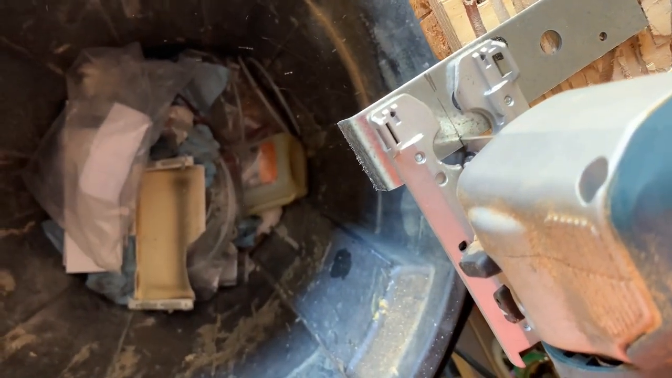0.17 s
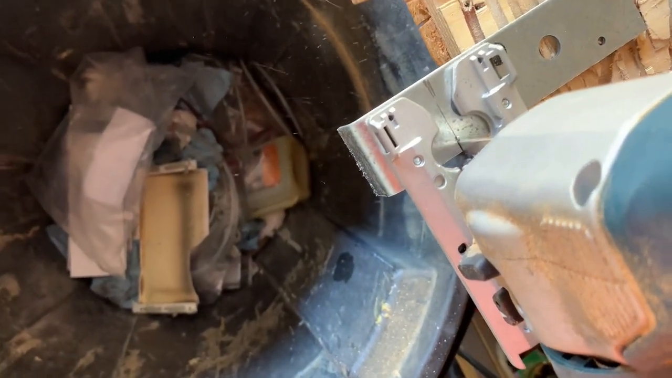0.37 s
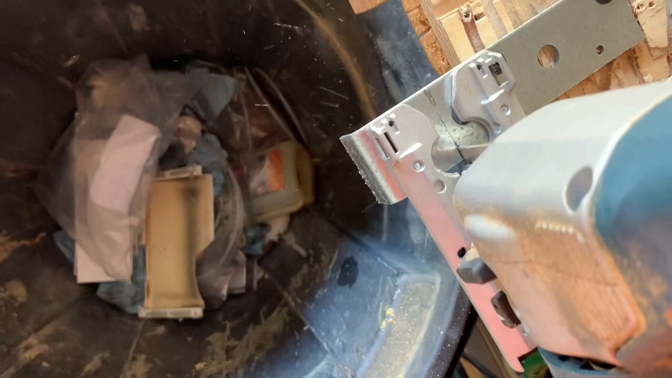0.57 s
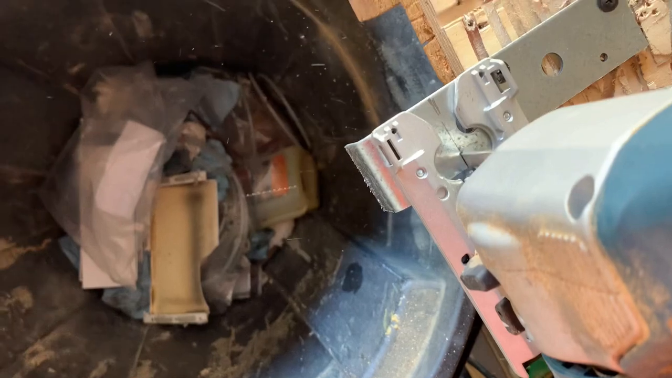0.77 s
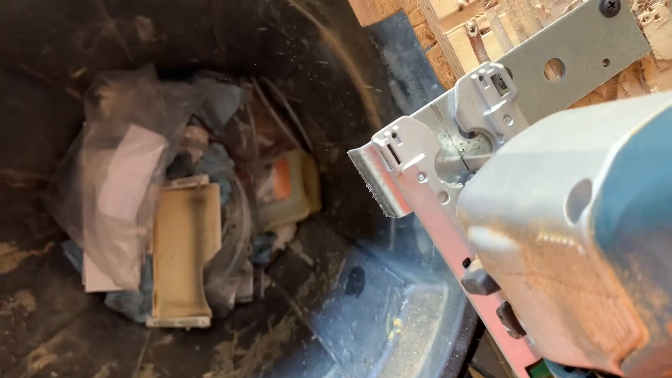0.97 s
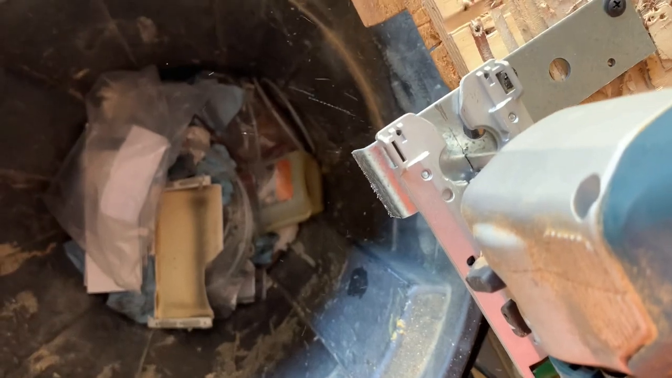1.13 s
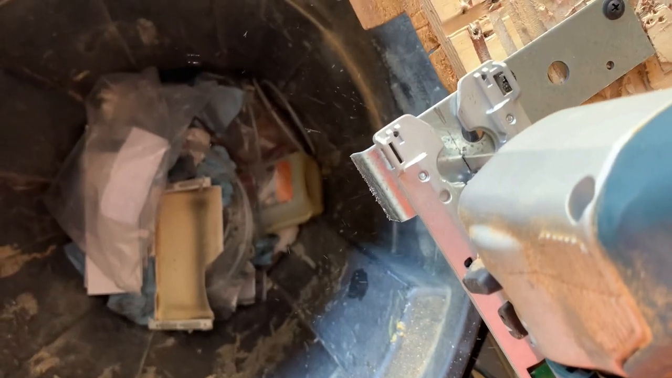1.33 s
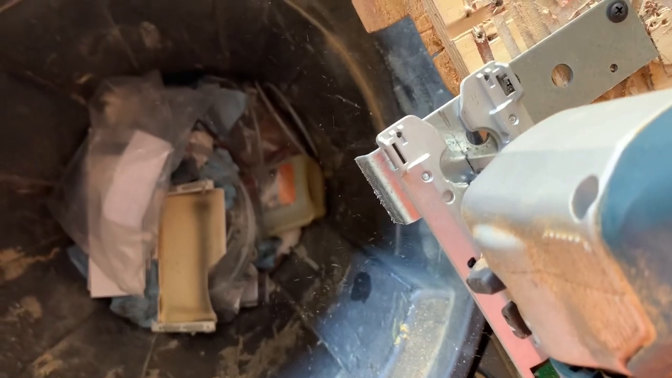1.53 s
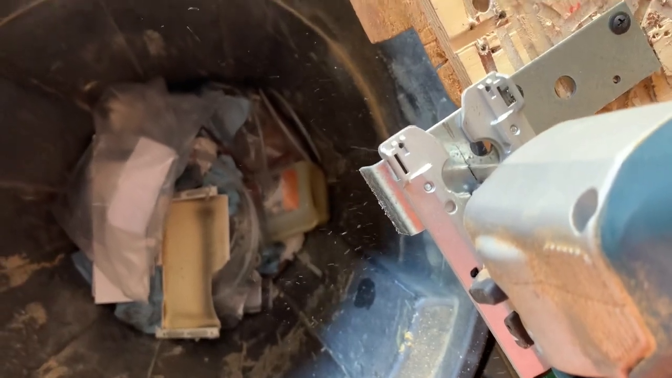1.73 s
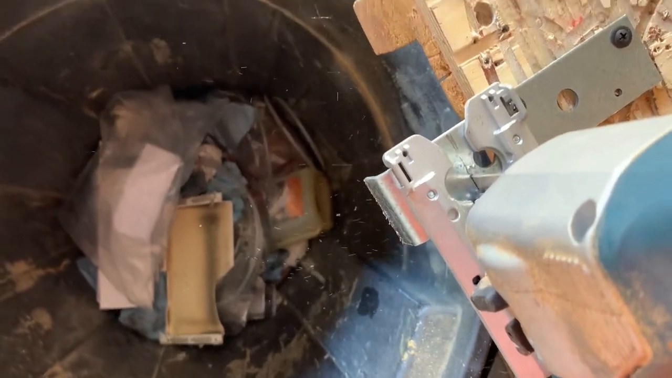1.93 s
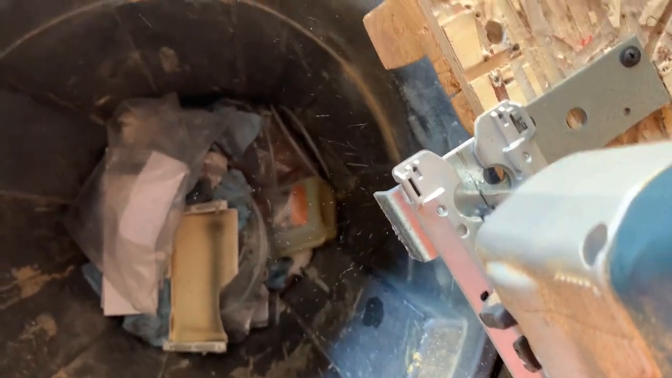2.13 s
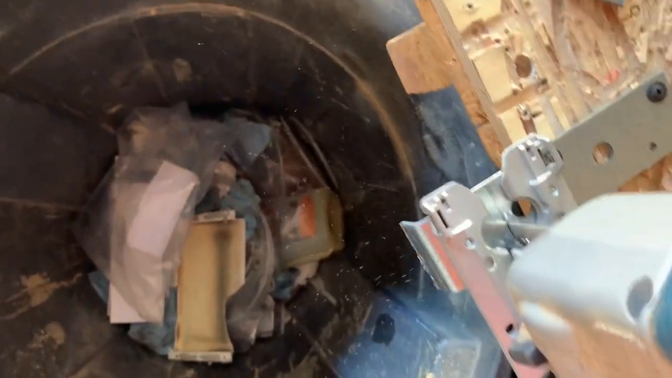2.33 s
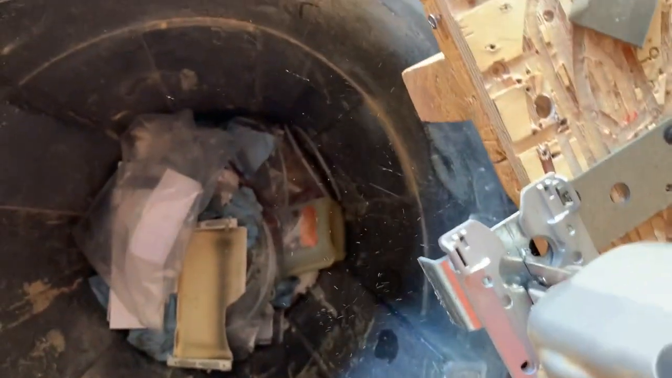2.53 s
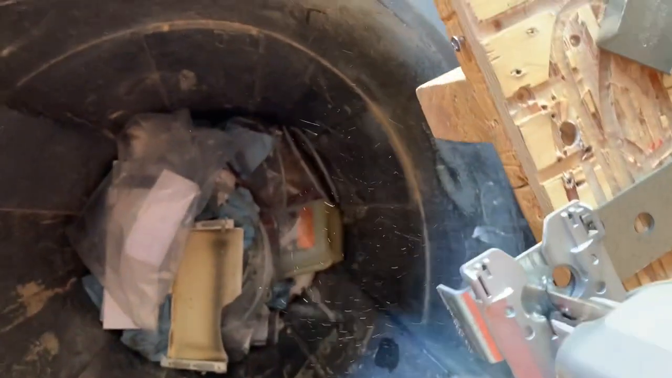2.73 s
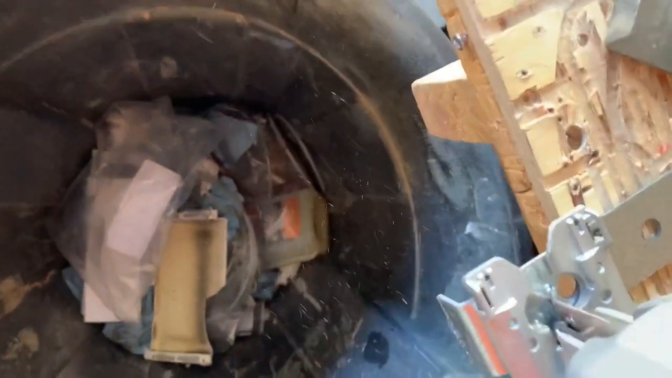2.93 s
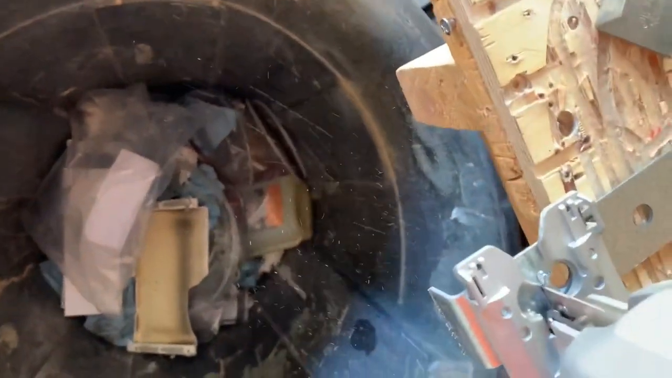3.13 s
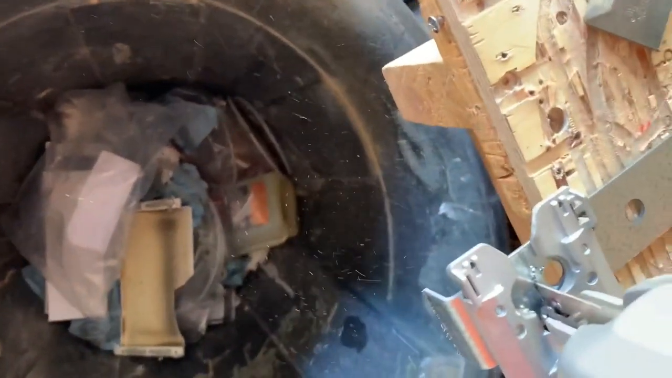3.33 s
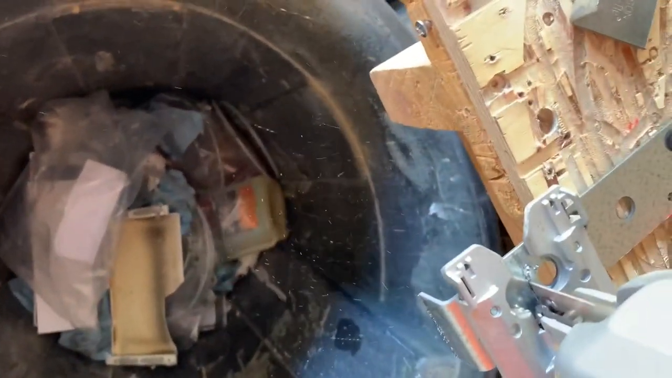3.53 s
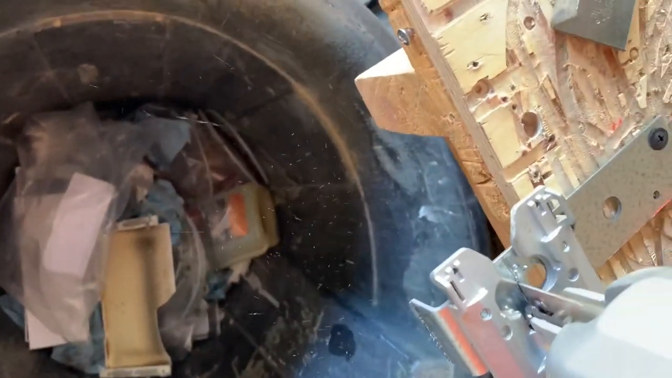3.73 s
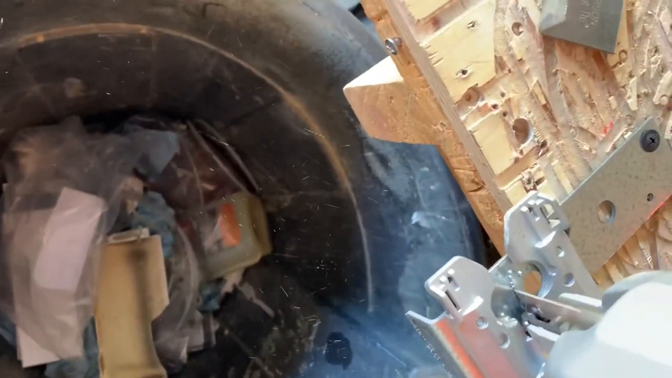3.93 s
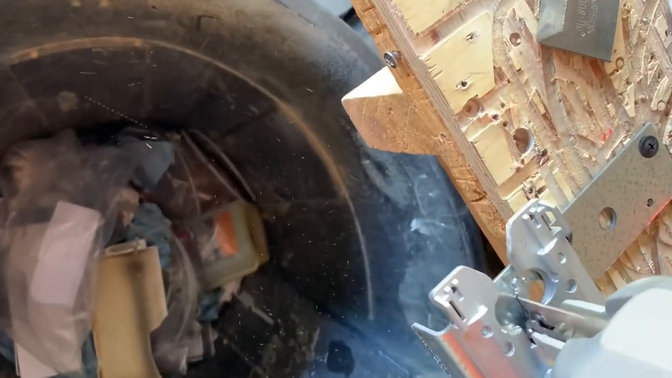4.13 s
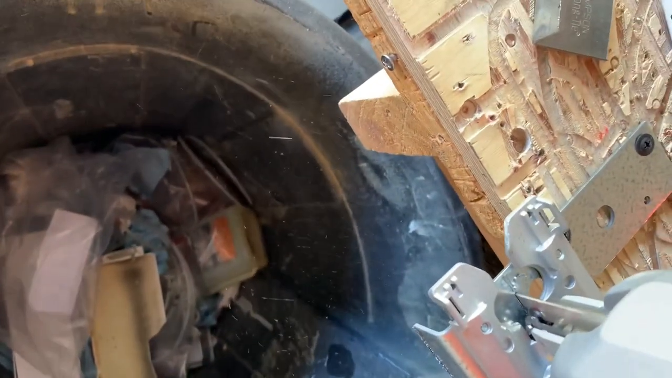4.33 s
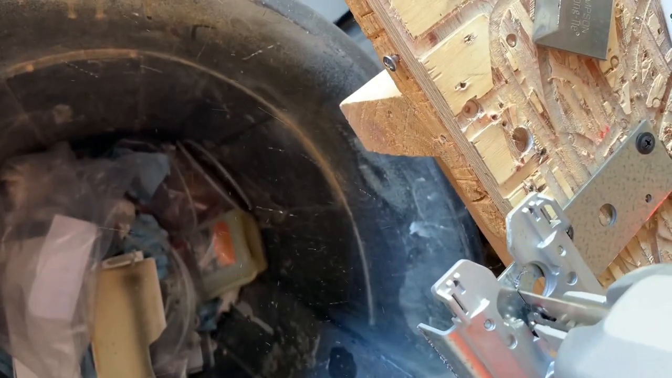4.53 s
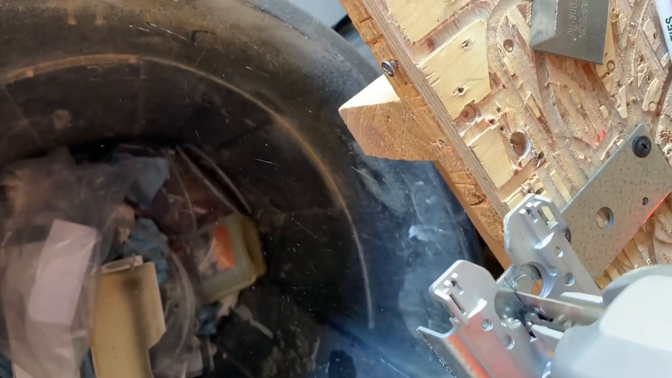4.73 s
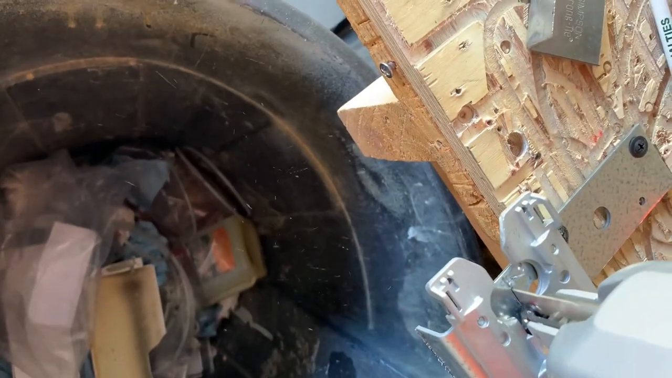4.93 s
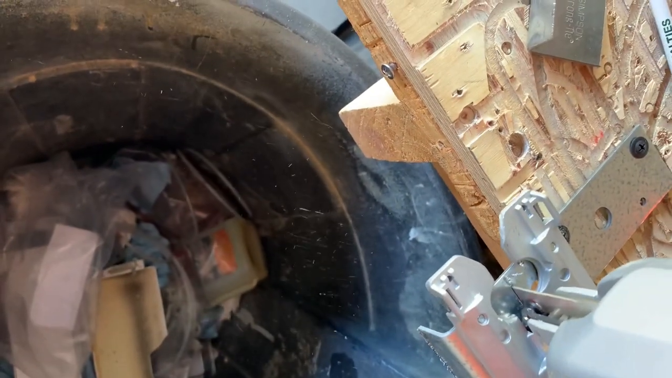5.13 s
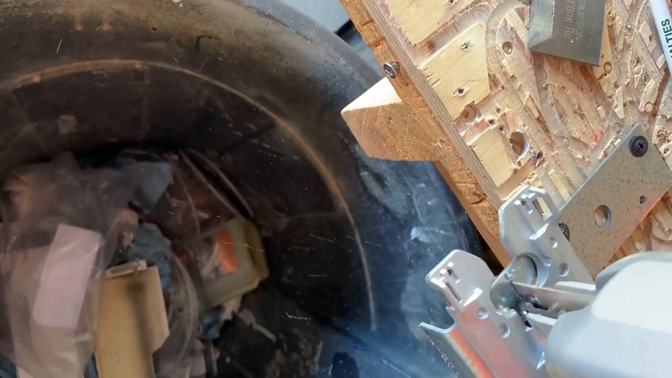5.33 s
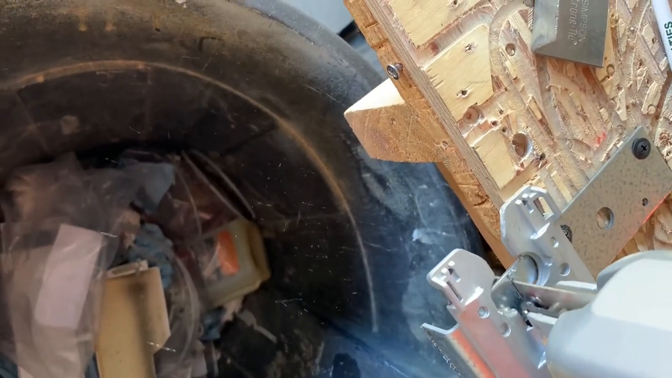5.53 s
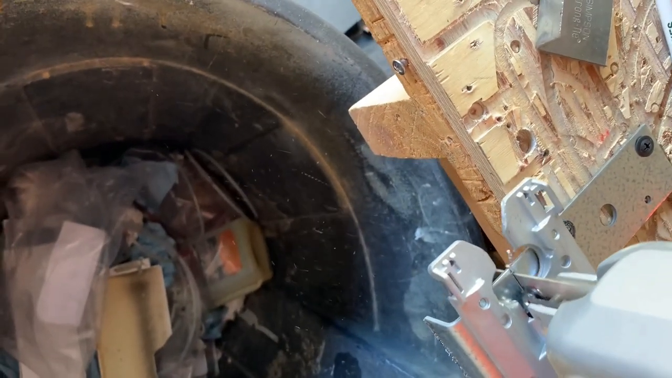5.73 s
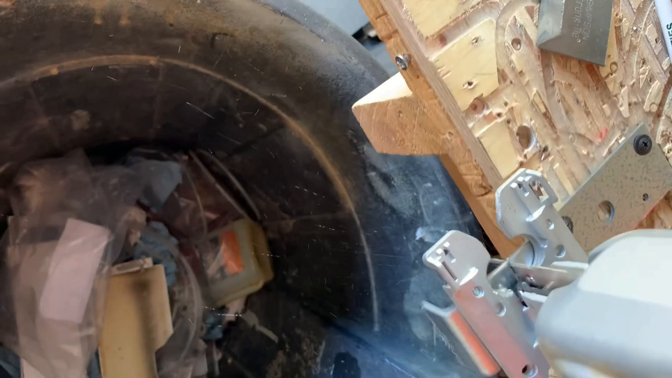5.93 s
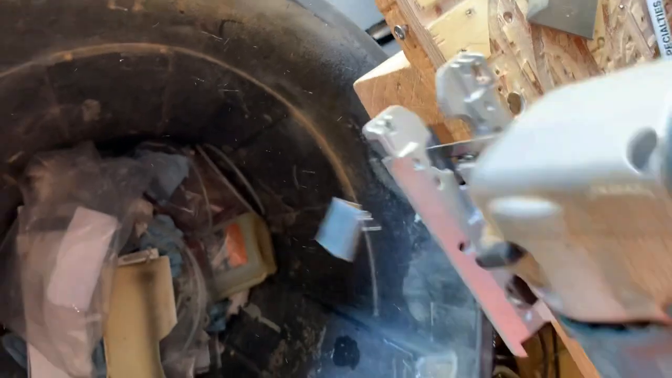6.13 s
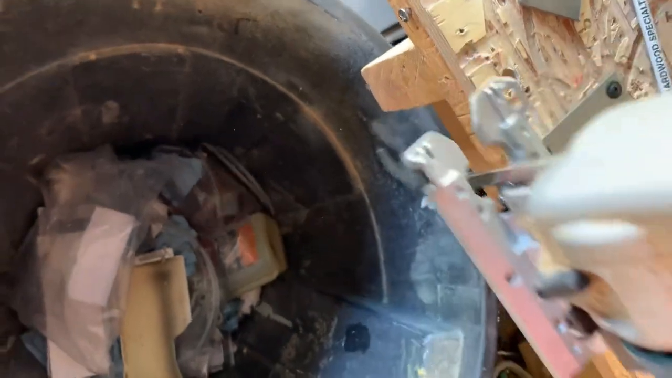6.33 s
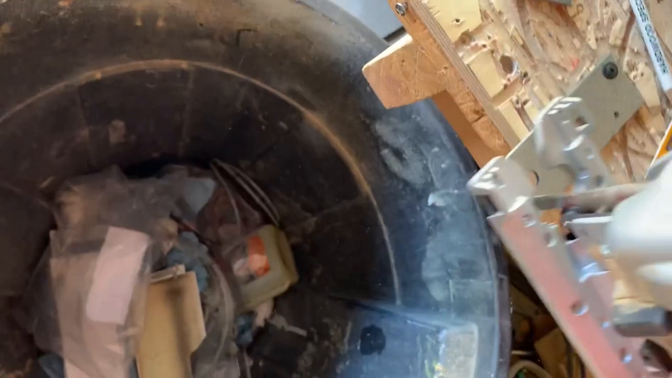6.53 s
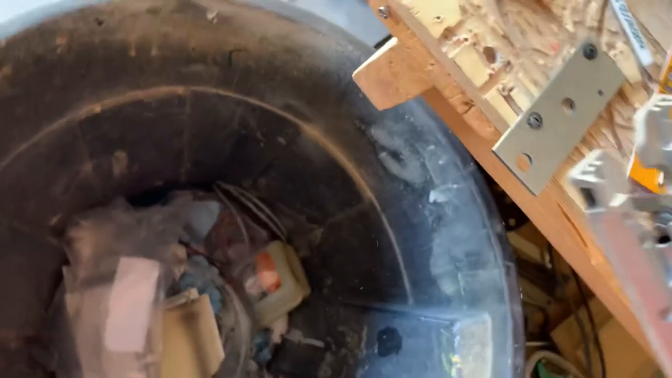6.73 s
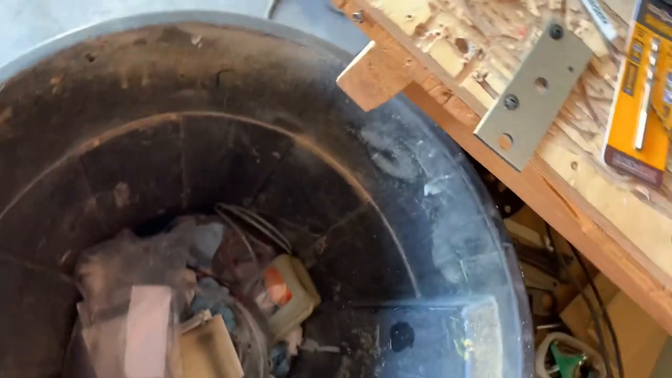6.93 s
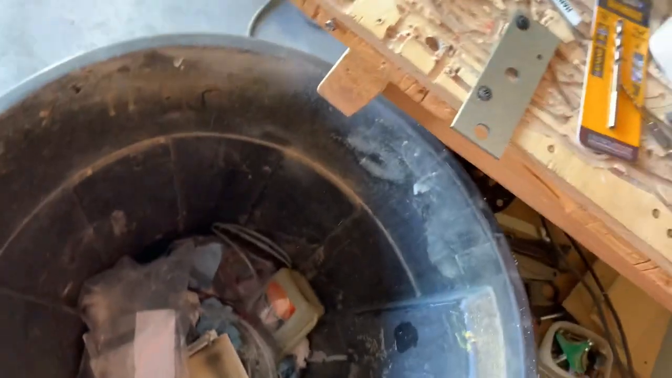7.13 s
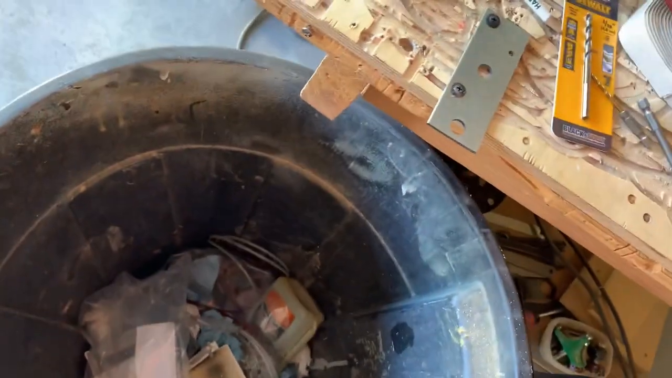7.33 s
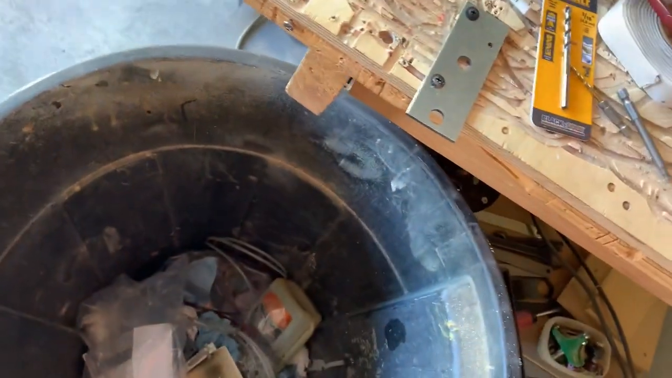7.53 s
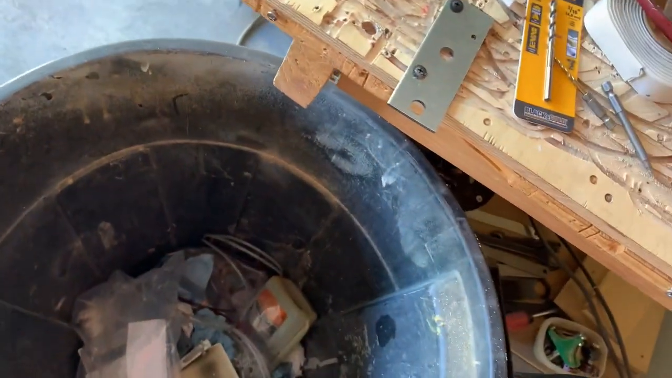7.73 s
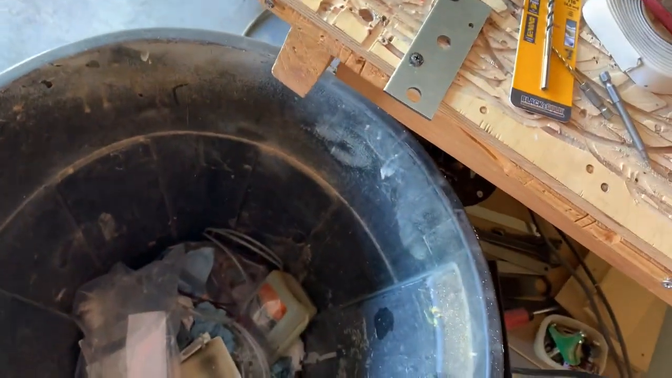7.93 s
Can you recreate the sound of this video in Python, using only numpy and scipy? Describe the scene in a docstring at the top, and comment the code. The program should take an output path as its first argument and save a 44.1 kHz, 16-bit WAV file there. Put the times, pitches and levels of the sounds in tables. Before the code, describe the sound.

Harsh buzzing metal sawing in a small workshop, with shrill squeal and snagging teeth, until the cut frees and the saw's whine winds down.

```python
"""Close to the microphone a jigsaw squeals and rasps through a steel bracket screwed to a bench in a small workshop.
About 47 times a second the blade bites, the drive knocks and the bench hums; now and then a tooth snags.
At six seconds the cut is through: the saw is switched off, bumps as it is lifted and rattles down to single clacks.
Noise through resonances makes steel, housing and bench; sines locked to the stroke make the hum and the buzz."""
import sys
import numpy as np
from scipy import signal
from scipy.fft import rfft, irfft, next_fast_len
from scipy.io import wavfile

SR = 44100
rng = np.random.default_rng(int(sys.argv[2]) if len(sys.argv) > 2 else 0)


def to_wav(sig):
    """Store sig (one row per channel, or 1-D mono) as 16-bit WAV at the path in sys.argv[1].

    Samples outside -1..1 are clipped; the rate is SR.
    """
    pcm = np.clip(np.atleast_2d(sig), -1, 1) * 32767
    pcm = np.round(pcm).astype(np.int16)
    wavfile.write(sys.argv[1], SR, pcm.T)  # frames by channels


N = 352359
TIME = np.arange(N) / SR

# Blade speed under power. Each row: time in seconds, speed in strokes per second.
POWERED_SPEED = [(0.0, 49.75), (0.4, 47.27), (0.9, 47.75), (1.4, 47.37), (2.0, 47.71), (2.3, 49.1),
                 (2.8, 47.57), (3.2, 46.67), (3.55, 47.69), (4.9, 47.2), (5.3, 46.87), (5.75, 47.58),
                 (5.95, 45.66)]
# Once switched off, friction slows the drive evenly.
CUT_ENDS_S, SWITCH_OFF_S, BRAKING_HZ_PER_S = 5.98, 6.1, 19.72

# The hand leans on the saw. Each row: start in seconds, end in seconds, force (about 0-1).
PUSHES = [(0.002, 0.478, 0.78), (1.14, 1.293, 0.59), (5.64, 5.987, 0.57)]
PUSH_EASE_S = 0.15
# Just before the tilt the weight comes off the bench top and it buzzes less.
LIFT_S, LIFT_DB = 2.0, -7
# About then the slot widens, over this time.
SLOT_WIDENS_S = 0.4
# Midway the saw tilts, so that its shoe no longer lies flat; the shoe hops at first, then settles.
TILT_S, TILT_TAKES_S = 2.63, 0.26
HOP_STARTS_S, HOP_RISE_S = 2.64, 0.1
HOP_SETTLES_S, HOP_FADE_S = 3.2, 1
# Deep in the cut the shoe's chatter moves to lower orders and the bracket clangs more.
DEEP_S, DEEP_TAKES_S, DEEP_CLANG_DB = 4.34, 0.51, 5
# Towards the end the thinning bracket works loose.
LOOSE_S, LOOSENING_TAKES_S = 5.3, 0.53
FEED_WANDER_DB = .6  # the hand feeds the saw unevenly

# Loudness of each part in the cut. Each one: plain level in dB, then the dB added by a full push,
# by the tilt and by the loose bracket.
RASP_LEVEL = (-32, 8, 1, 4)
RING_LEVEL = (-33, 5.5, -3, -1.5)
CLANG_LEVEL = (-51, 12, 6.5, 0)
KNOCK_LEVEL = (-35.5, 3, -0.2, -0.5)
SHOE_LEVEL = (-46, 7.5, 5.5, -0.5)
BENCH_LEVEL = (-45.5, 8, -1, 0)
# The same four columns for the bench's upper orders, against the low ones.
UPPER_LEVEL = (-4.5, -2.5, -1.5, -2)

# Squeal of the blade, strongest while it runs tight in the fresh slot. Each row: time in seconds, level in dB.
SQUEAL_LEVEL = [(0, -26.5), (.25, -23.5), (.55, -27.5), (1.05, -26.5), (1.9, -31), (2.25, -37.5),
                (3.4, -40.5), (4.3, -38), (4.65, -36.5), (5.55, -35.5), (5.9, -34.5)]
# Rough screech and clean chirp against the squeal. Each one: dB in the tight slot, dB added once it has widened.
SCREECH_LEVEL = (-2, 4.5)
CHIRP_LEVEL = (-4.5, 0.5)
# Pitch of the chirp, its scatter from bite to bite and its wobble within one.
CHIRP_HZ, CHIRP_SCATTER_HZ, CHIRP_WOBBLE_HZ = 6400, 70, 130
CHIRP_PLACE, CHIRP_WIDTH = .155, .047  # shares of a stroke
TOOTH_SLIP_SAMPLES = 7  # play of the blade from stroke to stroke
# Hiss of the teeth dragging back through the slot. Each row: time in seconds, level in dB.
DRAG_LEVEL = [(0, -32), (1.0, -35), (2.2, -35), (3.2, -34), (4.0, -37), (5.9, -37)]
# Contacts within one stroke. Each row: place in the stroke (0-1), relative level in dB.
KNOCKS = [(0.172, -3.5), (0.314, -5), (0.387, -2.5), (0.463, -1.5), (0.772, -1.5)]
# Teeth that snag. Each row: start in seconds, relative level in dB.
SNAGS = [(0.0956, -14), (0.177, -9), (0.9562, -13), (0.998, -5), (1.3563, -16), (3.0035, -8), (3.6815, -10),
         (4.1649, -19), (4.8213, -10), (4.9057, -14), (5.1597, -15), (5.3078, -12), (5.5625, -7),
         (5.7334, -4.5), (5.8591, -16), (5.9249, -10)]
# The nearly severed piece sings, lower as its last bridge of steel thins.
# Each row: time in seconds, pitch in Hz, level in dB.
OFFCUT = [(3.8, 10880, -39.5), (5.5, 10080, -27), (5.97, 9500, -34), (6.04, 8900, -25), (6.45, 9000, -100)]

# Resonances of blade, bracket, drive housing, shoe, bench, the bracket's clang and the bench thud.
# Each row: frequency in Hz, width in Hz, relative level in dB.
BLADE_MODES = [(5730, 560, -7.5), (6420, 110, -0.5), (6880, 300, -10.5), (7460, 170, -6.5)]
BRACKET_MODES = [(2400, 2100, -3.5), (3039, 130, 10), (3087, 380, 5.5), (3930, 420, 6.5)]
HOUSING_MODES = [(1195, 355, 3), (1352, 205, 9.5), (1374, 154, 5), (1578, 160, 1), (1800, 88, -1),
                 (2096, 210, -9)]
SHOE_MODES = [(689, 61, -1.5), (787, 24, 6), (922, 45, 5), (1002, 80, -0.5), (1102, 63, 2.5)]
BENCH_MODES = [(163, 92, -0.5), (336, 114, -3), (445, 103, 0.5), (632, 145, -4)]
CLANG_MODES = [(2960, 84, 0)]
THUD_MODES = [(50.6, 17, -3), (127, 40, -3), (200, 90, -7), (305, 49, 0)]

# Spectra of the cutting rasp, the dragging teeth, the gears at full and at low speed, the fan's air and the clacks.
# Each row: frequency in Hz, relative density in dB per Hz.
RASP_SPECTRUM = [(1200, -22), (2400, -7), (4000, -2), (5600, -1.5), (8000, -.5), (9000, 0), (10000, 1.5),
                 (11000, 1.5), (12200, -1.5), (14000, -2.5), (15800, -6)]
DRAG_SPECTRUM = [(3000, -20), (6500, -4), (10500, 0), (12500, -4), (15800, -10)]
FAST_GEAR_SPECTRUM = [(60, -27), (200, -25.5), (400, -9.5), (750, -4.5), (1300, 0.5), (1500, 1.5),
                      (1720, -8.5), (2000, -8), (2400, -6), (3000, -7), (3500, 2.5), (4200, -3.5),
                      (6000, -86), (14000, -45)]
SLOW_GEAR_SPECTRUM = [(100, -26), (300, -13.5), (550, -2.5), (1200, -1), (1700, 1), (2130, 3), (2450, -6),
                      (2950, 5), (3500, 6), (4100, -49), (6000, -1), (14000, -30)]
AIR_SPECTRUM = [(1500, -20), (4000, -3), (5000, -.5), (6200, 0), (7000, 2.5), (7700, -3), (9000, -2),
                (11000, -.5), (12300, -5), (15800, -10)]
CLACK_SPECTRUM = [(150, -30), (500, -9), (1700, 1), (3200, 1), (4500, -5), (7000, -4), (11000, -8),
                  (15800, -22)]

# The bench top buzzes as the saw is pressed on it. Each row: multiple of the stroke rate, plain level in dB,
# dB added by a full push, dB added by the tilt.
BUZZ_ORDERS = [(6, -61, 16, -7), (7, -56, 14, -4), (8, -55, 17, -14), (9, -57, -3, -2), (10, -52, 11, -8),
               (11, -52, 9, -4), (12, -46.5, 4, -6), (13, -49.5, 2, -6)]
# The shoe chatters on the bracket in step with the stroke. Each row: multiple of the stroke rate,
# level in dB lying flat, in dB tilted, in dB deep in the cut, dB added by a full push.
SHOE_ORDERS = [(14, -53, -54.5, -50, 3), (15, -54, -58, -48.5, 3), (16, -58, -49, -50, -2),
               (18, -53, -57, -55, -5), (19, -59, -66, -51, 13), (20, -61, -66, -61, 14),
               (21, -55, -44.5, -47.5, -10), (22, -52, -44.5, -46, -8), (23, -49, -48.5, -48, 0),
               (24, -46.5, -44.5, -51, -10), (25, -48.5, -53, -60, -8), (27, -48, -48.5, -49, 1),
               (28, -58, -52, -47, 5), (30, -52, -52, -56, 7), (31, -52, -57, -58, 0),
               (32, -53, -66, -66, -5), (34, -47.5, -63, -63, 0), (35, -48, -58, -64, -10),
               (36, -58, -52, -52, -5), (37, -53, -49, -56, 0), (38, -54, -66, -52, -5),
               (39, -54, -52, -53, 0), (46, -53, -66, -64, -8)]
BUZZ_PLACE, CHATTER_PLACE = .14, .41  # where in the stroke (0-1) bench top and shoe are struck
# The motor's strongest tone under load, at this multiple of the stroke rate.
MOTOR_ORDER = 26
# Its level. Each row: time in seconds, level in dB.
MOTOR_LEVEL = [(0, -36), (.14, -40), (.4, -58), (1.0, -51), (2.1, -44), (2.35, -39.5), (3.15, -35.5),
               (3.4, -41), (3.85, -38), (4.35, -40), (4.7, -47.5), (5.15, -39.5), (5.9, -49)]
# Side tones around it while the saw is rocked over. Each row: multiple of the stroke rate, level in dB.
ROCKING_ORDERS = [(24, -43), (27, -38)]
ROCKING_S, ROCKING_SPREAD_S = 2.64, 0.13
# Side tones while the shoe hops. Each row: multiple of the stroke rate, level in dB.
HOP_SIDE_ORDERS = [(25.5, -43), (26.5, -51)]
TONE_WANDER_DB, TONE_ROUGH_RAD = 2.0, .24
TONE_SCATTER = .72  # range of the orders' random phases, in turns

# Shaking of the bench. Each row: time in seconds, level in dB.
HUM_LEVEL = [(0.0, -45.5), (0.42, -38.5), (0.68, -44), (2.02, -43.5), (2.35, -49), (2.61, -41.5),
             (2.98, -48), (5.46, -53), (5.99, -51), (6.02, -48), (6.25, -68)]
# The bench's low orders, against its shaking. Each row: multiple of the stroke rate, relative level in dB.
HUM_ORDERS = [(2, -12), (3, 0)]
# Its upper orders. Each row: multiple of the stroke rate, relative level in dB.
UPPER_ORDERS = [(4, -9.5), (5, 2.5)]
# The saw's own sway, even all through the cut. Each row: multiple of the stroke rate, level in dB.
SWAY_ORDERS = [(1, -63), (2, -58.5)]
SWAY_FADE_S = 6.1  # the saw leaves the bench and the hum fades
# The shoe hops on every second stroke. Each row: multiple of the stroke rate, relative level in dB.
HOP_ORDERS = [(1.5, -10), (2.5, -2), (3.5, -5), (4.5, -6)]
HOP_DB, HOP_KNOCK_DB = -46.5, 4  # gain of its half orders; extra knocking while it hops
HOP_LIMP = 0.19  # share by which every second stroke is harder while it hops

# The free-running gears and fan. Each one: level in dB at full speed, power of the speed that the amplitude follows.
GEAR_LAW = (-33.5, 1.68)
AIR_LAW = (-32.5, 2.1)
# The slack of the drive closes four times a stroke. Each row: place in the stroke (0-1), strength.
SLACK = [(.17, .6), (.42, 1.0), (.67, .6), (.92, 1.0)]
# The rattle changes colour between these speeds, in strokes per second.
SLOW_RATTLE_HZ, FAST_RATTLE_HZ = 22.6, 33.24
# Whine of the meshing gears as they run down, swelling where it meets a resonance of the case.
# Each row: time in seconds, pitch in Hz, relative level in dB.
WHINE = [(6.12, 1860, -60), (6.22, 1780, -41), (6.35, 1660, -45), (6.48, 1530, -49), (6.6, 1410, -46),
         (6.75, 1270, -42), (6.85, 1160, -59), (7.0, 1020, -60), (7.38, 730, -74), (7.46, 670, -62),
         (7.55, 635, -51), (7.64, 575, -69), (7.75, 480, -63), (7.82, 440, -81)]
# Resonances of the case, each rattled hardest around one speed. Each row: frequency in Hz, width in Hz,
# level in dB at its best speed, that speed in strokes per second, spread in strokes per second.
CASE_MODES = [(1700, 83, -40, 41, 4.4), (1760, 62, -42, 32.4, 5.1), (3530, 60, -46, 43, 2.7),
              (3760, 77, -41.5, 31.3, 5.6), (3410, 44, -51, 28, 4.8), (2080, 65, -54, 27, 11.4),
              (2880, 130, -53, 16.2, 3.2), (2680, 100, -55, 12.5, 2.3), (805, 35, -62, 11.7, 1)]
# At low speed the slack closes with single clacks. Each row: start in seconds, relative level in dB.
CLACKS = [(7.1612, -27), (7.243, -28), (7.3333, -31), (7.3822, -28), (7.4316, -31), (7.4865, -30),
          (7.5408, -41), (7.6017, -38), (7.6655, -43), (7.7369, -39), (7.7957, -34), (7.904, -36)]
# The shoe bumps the bench. Each row: start in seconds, relative level in dB.
BUMPS = [(6.313, -34.5), (6.36, -43)]

# Colour of the workshop's reflections. Each row: frequency in Hz, relative level in dB.
ROOM_COLOUR = [(100, -8), (300, 1), (600, 3), (1100, -2), (1600, -2), (2800, 0), (4300, -12), (9000, -13),
               (15800, -12)]
# Spectrum of the quiet room. Each row: frequency in Hz, relative density in dB per Hz.
QUIET_SPECTRUM = [(30, -2), (100, 11), (200, -3), (1000, -12), (8000, -28)]
QUIET_DB = -84
# Phase by which the left microphone port leads the right. Each row: frequency in Hz, lead in half turns.
PORT_LEAD = [(0, 0), (2100, 0), (4700, 1), (6850, 2), (8950, 3), (11100, 4), (13100, 5), (15300, 6),
             (22050, 9)]
CUTOFF_HZ = 15800


def cutting(turns):
    """Teeth bite on the pull and drag on the return; the knocks shake housing, shoe and bench."""
    blows = knocks(turns, jitter_s=.0006, uneven_db=1.6)
    limp = 1 + HOP_LIMP * hopping() * np.cos(np.pi * turns)
    feed = from_db(FEED_WANDER_DB * drift(11))
    sound = limp * cut_steel(turns) + struck_body(turns, blows)
    return feed * sound * (1 - ease(CUT_ENDS_S, takes_s=0.0043))


def cut_steel(turns):
    """Blade and bracket: grit of the teeth heard as rasp, drag hiss, squeal, ring and clang."""
    # near the end the loose bracket gives way on the return, so the pulls stand out
    grip = np.interp(TIME, [5.4, 5.7], [1, .6])
    pull = window(turns, place=0.13, width=0.1, uneven_db=1.3, lean=.45)
    back = window(turns, place=0.88, width=0.33, uneven_db=3.5) * grip
    rasp = rms_one(colour(grit(grain_db=2.1) * (.7 * grip + pull + .25 * back), RASP_SPECTRUM))
    dragging = window(turns, place=.66, width=.13, uneven_db=2, lean=.35)
    drag = rms_one(colour(grit(grain_db=2) * dragging, DRAG_SPECTRUM))
    # the bracket flexes just after the bite
    flex = window(turns, place=.17, width=.14, uneven_db=1.3, lean=.5)
    scrape = tooth_grit(turns, grain_db=2, alike=.42) * (.85 * grip + .7 * flex + .1 * back)
    ring = rms_one(resonate(scrape, BRACKET_MODES))
    clang = rms_one(resonate(grit(grain_db=2) * (.5 + pull + back), CLANG_MODES))
    clang_db = part_level(CLANG_LEVEL) + DEEP_CLANG_DB * ease(DEEP_S, DEEP_TAKES_S)
    steel = from_db(part_level(RASP_LEVEL)) * rasp + from_db(in_time(DRAG_LEVEL)[0]) * drag
    steel = steel + from_db(part_level(RING_LEVEL)) * ring + from_db(clang_db) * clang
    return steel + from_db(in_time(SQUEAL_LEVEL)[0]) * squealing(turns, back)


def squealing(turns, back):
    """Each bite rings the blade's resonances as a rough screech, with a clean chirp on top."""
    bite = window(turns, place=.125, width=.047, uneven_db=.9, lean=.5)
    screech = rms_one(resonate(grit(grain_db=1.0) * (0.62 + bite + 0.24 * back), BLADE_MODES))
    # the blade's free length changes, so its pitch shifts from bite to bite
    screech = np.interp(TIME + .00016 * drift(45), TIME, screech)
    wide = ease(LIFT_S, SLOT_WIDENS_S)
    screech_db = SCREECH_LEVEL[0] + SCREECH_LEVEL[1] * wide
    chirp_db = CHIRP_LEVEL[0] + CHIRP_LEVEL[1] * wide
    return from_db(screech_db) * screech + from_db(chirp_db) * chirps(turns)


def chirps(turns):
    """On each bite the blade sticks and slips: a clean chirp of a few milliseconds, at a slightly new pitch."""
    stroke = turns.astype(int)
    sharp, late = rng.standard_normal((2, 1024))[:, stroke]
    hz = CHIRP_HZ + CHIRP_SCATTER_HZ * sharp + CHIRP_WOBBLE_HZ * drift(1100)
    swell = window(turns + .008 * late, place=CHIRP_PLACE, width=CHIRP_WIDTH, uneven_db=1.2, lean=.2)
    return rms_one(swell * from_db(2 * drift(900)) * np.sin(2 * np.pi * np.cumsum(hz) / SR))


def struck_body(turns, blows):
    """The knocks and a floor of grit ring the resonances of housing, shoe and bench."""
    # the housing rattles hardest mid-stroke
    chatter = .3 + window(turns, place=.35, width=.08, uneven_db=2, lean=.3)
    shaken = blows + chatter * tooth_grit(turns, grain_db=1.5, alike=.5)
    housing = rms_one(band(resonate(shaken, HOUSING_MODES), 1050, 3200))
    shoe = rms_one(band(resonate(blows + .55 * grit(grain_db=1.5), SHOE_MODES), 640, 1350))
    bench_drive = band(blows, 320, 3000) + 1.1 * grit(grain_db=1.5)
    bench = rms_one(band(resonate(bench_drive, BENCH_MODES), 110, 720))
    housing_db = part_level(KNOCK_LEVEL) + HOP_KNOCK_DB * hopping()
    body = from_db(housing_db) * housing + from_db(part_level(SHOE_LEVEL)) * shoe
    return body + from_db(part_level(BENCH_LEVEL)) * bench


def knocks(turns, jitter_s, uneven_db):
    """Clicks where the slack in drive and shoe is taken up, at the same places in every stroke."""
    out = np.zeros(N)
    strokes = np.arange(1, int(turns[-1]))
    for place, db in KNOCKS:
        late, loud = rng.standard_normal((2, 1024))[:, strokes]
        at = (np.interp(strokes + place, turns, TIME) + jitter_s * late) * SR
        out[np.clip(at.astype(int), 0, N - 1)] += from_db(db + uneven_db * loud)
    return rms_one(out)


def tooth_grit(turns, grain_db, alike):
    """The same teeth pass the edge in the same order on every stroke, so a share of their grit repeats."""
    starts = np.searchsorted(turns, np.arange(int(turns[-1]) + 1))
    slip = rng.integers(0, TOOTH_SLIP_SAMPLES, 1024)[:len(starts)]
    since_start = np.arange(N) - (starts - slip)[turns.astype(int)]
    repeated = grit(grain_db)[since_start]
    share = np.clip(alike, 0, 1)
    return np.sqrt(share) * rms_one(repeated) + np.sqrt(1 - share) * grit(grain_db)


def snags():
    """A caught tooth tears free: a short screech of the blade with a bright crack."""
    screech = rms_one(resonate(grit(grain_db=2), BLADE_MODES))
    crack = rms_one(colour(grit(grain_db=2), RASP_SPECTRUM))
    return from_db(-6) * (screech + crack) * bursts(SNAGS, rise_s=.001, decay_s=.0024)


def offcut(turns):
    """Each pull of the blade feeds a thin ring that lingers just after the cut is through."""
    hz, db = in_time(OFFCUT)
    rubbed = np.interp(TIME, [CUT_ENDS_S - .03, CUT_ENDS_S], [1, .1])
    pulls = 1 + rubbed * (window(turns, place=.16, width=.12, uneven_db=2, lean=.4) * 1.3 - .6)
    wobble_hz = 380 * rubbed * drift(900)
    tone = np.sin(2 * np.pi * np.cumsum(hz + wobble_hz) / SR)
    return from_db(db + 0.96 * rubbed * drift(90)) * pulls * tone


def buzz(turns):
    """Higher orders in bench top, shoe and motor, for as long as the blade is in the steel."""
    push, tilt, deep = pushing(), ease(TILT_S, TILT_TAKES_S), ease(DEEP_S, DEEP_TAKES_S)
    lifted_db = LIFT_DB * ease(LIFT_S, PUSH_EASE_S) * (1 - tilt)
    sound = rough_tone(turns, MOTOR_ORDER, in_time(MOTOR_LEVEL)[0], CHATTER_PLACE)
    for multiple, plain_db, push_db, tilt_db in BUZZ_ORDERS:
        db = plain_db + push_db * push + tilt_db * tilt + lifted_db
        sound = sound + rough_tone(turns, multiple, db, BUZZ_PLACE)
    for multiple, flat_db, tilted_db, deep_db, push_db in SHOE_ORDERS:
        db = flat_db + (tilted_db - flat_db) * tilt + (deep_db - tilted_db) * deep + push_db * push
        sound = sound + rough_tone(turns, multiple, db, CHATTER_PLACE)
    rocking = np.exp(-.5 * ((TIME - ROCKING_S) / ROCKING_SPREAD_S) ** 2)
    sound = sound + rocking * orders(turns, ROCKING_ORDERS, waver_db=1.0)
    sound = sound + hopping() * orders(turns, HOP_SIDE_ORDERS, waver_db=1.0)
    return sound * (1 - ease(CUT_ENDS_S, takes_s=0.022))


def bench_hum(turns):
    """The reciprocating mass sways the saw and shakes the bench; a hopping shoe adds half orders."""
    low = orders(turns, HUM_ORDERS, waver_db=1.0)
    upper = from_db(part_level(UPPER_LEVEL)) * orders(turns, UPPER_ORDERS, waver_db=1.0)
    shaking = from_db(in_time(HUM_LEVEL)[0]) * (low + upper)
    sway = orders(turns, SWAY_ORDERS, waver_db=1.0)
    hop = from_db(HOP_DB) * hopping() * orders(turns, HOP_ORDERS, waver_db=1.0)
    return (shaking + sway) * (1 - ease(SWAY_FADE_S, takes_s=0.34)) + hop


def running_out(turns, speed):
    """Unloaded gears rattle as their slack closes, the fan hisses and the whines of gear and motor sink."""
    slack = sum(strength * window(turns, place, width=.055, uneven_db=2.5, lean=.6) for place, strength in SLACK)
    rattle = .95 + slack
    slow = np.interp(speed, [SLOW_RATTLE_HZ, FAST_RATTLE_HZ], [1, 0])
    fast_gears = rms_one(colour(grit(grain_db=1.5) * rattle, FAST_GEAR_SPECTRUM))
    slow_gears = rms_one(colour(grit(grain_db=1.5) * rattle, SLOW_GEAR_SPECTRUM))
    gears = np.sqrt(1 - slow) * fast_gears + np.sqrt(slow) * slow_gears
    air = rms_one(colour(grit(grain_db=3.5) * (3.8 + slack), AIR_SPECTRUM))
    # the motor's brushes whine at 390 times the stroke rate
    brushes = from_db(-19 + 3 * drift(12)) * np.sin(2 * np.pi * 390 * turns + 1.5 * drift(400))
    free = from_db(speed_level(GEAR_LAW, speed)) * gears
    free = free + from_db(speed_level(AIR_LAW, speed)) * (air + brushes)
    free = free + case_rings(rattle, speed) + gear_whine()
    return free * np.interp(TIME, [5.7, 5.98], [0, 1])  # comes up over the last of the cut


def case_rings(rattle, speed):
    """The rattle wakes one resonance of the case after another as it slows."""
    out = 0
    for hz, width, db, best, spread in CASE_MODES:
        awake = np.exp(-.5 * ((speed - best) / spread) ** 2)
        out = out + from_db(db) * awake * rms_one(resonate(grit(grain_db=1) * rattle, [(hz, width, 0)]))
    return out


def gear_whine():
    """A wavering tone of the meshing gears sinks, and steadies, as the saw runs down."""
    hz, db = in_time(WHINE)
    waver = hz / WHINE[0][1]
    phase = 2 * np.pi * np.cumsum(hz) / SR + 1.3 * waver * drift(90)
    return np.sqrt(2) * from_db(db - 2 + 4 * waver * drift(70)) * np.sin(phase)


def clacks():
    """Each clack is a short burst of tiny contacts in the drive."""
    contacts = rms_one(colour(grit(grain_db=2), CLACK_SPECTRUM))
    return from_db(-4.5) * contacts * bursts(CLACKS, rise_s=.0015, decay_s=.007)


def bump():
    """The lifted saw thuds against the bench: noise through low resonances in short swells."""
    thud = rms_one(band(resonate(rng.standard_normal(N), THUD_MODES), 38, 460))
    return from_db(-4.5) * thud * bursts(BUMPS, rise_s=.008, decay_s=0.037)


def workshop(x, t60_s, common_db, apart_db):
    """Dense reflections from bench and walls, different at each microphone port."""
    age = TIME[:SR // 2]
    tail = rng.standard_normal((2, len(age))) * from_db(-60 * age / t60_s) * (age > .002)
    tail = colour(tail / np.sqrt(np.sum(tail ** 2) / 2), ROOM_COLOUR)
    common, apart = signal.fftconvolve(x[None], tail, axes=1)[:, :N]
    return from_db(common_db) * common + from_db(apart_db) * apart * np.array([[1], [-1]])


def quiet_room():
    """Faint dull background noise, independent in each channel."""
    return from_db(QUIET_DB) * rms_one(colour(rng.standard_normal((2, N)), QUIET_SPECTRUM))


def ports(x):
    """The treble reaches the left port earlier than the right."""
    size = next_fast_len(N + 4096)
    lead = np.pi * np.interp(np.fft.rfftfreq(size, 1 / SR), *np.transpose(PORT_LEAD))
    shift = np.exp(1j * lead * np.array([[.5], [-.5]]))  # half forward at the left, half back at the right
    return irfft(rfft(x, size) * shift, size)[:, :N]


def pushing():
    """How hard the hand leans on the saw, 0-1."""
    return sum(force * (ease(start, PUSH_EASE_S) - ease(end, PUSH_EASE_S)) for start, end, force in PUSHES)


def hopping():
    """How hard the shoe hops, 0-1: it starts as the saw tilts and dies away."""
    return ease(HOP_STARTS_S, HOP_RISE_S) * (1 - ease(HOP_SETTLES_S, HOP_FADE_S))


def part_level(law):
    """Level in dB of one part, from the push of the hand, the tilt of the saw and the looseness of the bracket."""
    plain_db, push_db, tilt_db, loose_db = law
    held_db = plain_db + push_db * pushing() + tilt_db * ease(TILT_S, TILT_TAKES_S)
    return held_db + loose_db * ease(LOOSE_S, LOOSENING_TAKES_S)


def speed_level(law, speed):
    """Level in dB of a free-running part, sinking with the speed."""
    full_db, power = law
    return full_db + power * 20 * np.log10(speed / POWERED_SPEED[-1][1])


def orders(turns, table, waver_db):
    """Sines locked to the stroke at whole and half multiples, their phases scattered."""
    out = 0
    for multiple, db in table:
        halves = round(2 * multiple)
        phase = 2 * np.pi * (halves / 2 * turns + np.sqrt(2) * halves ** 2)
        out = out + np.sqrt(2) * from_db(db + waver_db * drift(14)) * np.sin(phase)
    return out


def rough_tone(turns, multiple, db, place):
    """One order of a knock at a place in the stroke; it wanders in level and trembles in phase."""
    cycles = round(multiple) * (turns - place) + TONE_SCATTER * rng.random()
    phase = 2 * np.pi * cycles + TONE_ROUGH_RAD * drift(60)
    return np.sqrt(2) * from_db(db + TONE_WANDER_DB * drift(7)) * np.sin(phase)


def window(turns, place, width, uneven_db, lean=0):
    """A swell at one place in every stroke, each with its own strength; leaning makes it rise faster than it falls."""
    stroke = np.floor(turns - place + .5)
    strength = from_db(uneven_db * np.clip(rng.standard_normal(1024), -2, 2))[stroke.astype(int)]
    past = turns - place - stroke
    side_width = width * (1 + np.clip(lean, 0, .9) * np.sign(past))
    return strength * np.exp(-.5 * (past / side_width) ** 2)


def bursts(events, rise_s, decay_s):
    """Envelope that swells and dies at each event."""
    out = np.zeros(N)
    for s, db in events:
        at = max(int(s * SR), 0)
        age = TIME[:min(N - at, SR // 4)]
        out[at:at + len(age)] += from_db(db) * (1 - np.exp(-age / rise_s)) * np.exp(-age / decay_s)
    return out


def grit(grain_db):
    """Noise made of tiny contacts of uneven size, 16 samples each."""
    size_db = grain_db * np.repeat(rng.standard_normal(N // 16 + 1), 16)[:N]
    return rms_one(rng.standard_normal(N) * from_db(size_db))


def resonate(x, modes):
    """Parallel resonances with alternating signs."""
    out = 0
    for k, (hz, width, db) in enumerate(modes):
        r = np.exp(-np.pi * width / SR)
        poles = [1, -2 * r * np.cos(2 * np.pi * hz / SR), r * r]
        gain = (-1) ** k * from_db(db) * (1 - r * r) / 2
        out = out + gain * signal.lfilter([1, 0, -1], poles, x + 1e-18)
    return out


def colour(x, spectrum):
    """Shape a sound by a spectrum on a log-frequency axis, falling away below its first row."""
    size = next_fast_len(x.shape[-1] + 4096)
    hz, db = np.transpose(spectrum)
    f = np.maximum(np.fft.rfftfreq(size, 1 / SR), 1)
    gain = from_db(np.interp(np.log(f), np.log(hz), db)) * np.minimum(f / hz[0], 1) ** 2
    return irfft(rfft(x, size) * gain, size)[..., :x.shape[-1]]


def band(x, low_hz, high_hz):
    """Band-pass."""
    sos = signal.butter(2, [low_hz, min(high_hz, .45 * SR)], "band", fs=SR, output="sos")
    return signal.sosfilt(sos, x)


def drift(rate):
    """Chance wander with spread 1, taking a new value this many times a second."""
    knots = rng.standard_normal(8192)
    return rms_one(np.interp(TIME * rate, np.arange(len(knots)), knots))


def ease(at_s, takes_s):
    """A straight rise from 0 to 1, centred on a moment."""
    return np.clip((TIME - at_s) / takes_s + .5, 0, 1)


def in_time(rows):
    """Each column of a curve table at every sample."""
    s, *columns = np.transpose(rows)
    return [np.interp(TIME, s, c) for c in columns]


def rms_one(x):
    """Scale to unit power."""
    return x / np.sqrt(np.mean(x ** 2) + 1e-20)


def from_db(db):
    """Decibels to gain."""
    return 10 ** (np.asarray(db) / 20)


def scene():
    """One stroke count drives every part of the saw; the workshop answers and the quiet room lies beneath."""
    speed = in_time(POWERED_SPEED)[0] - BRAKING_HZ_PER_S * np.maximum(TIME - SWITCH_OFF_S, 0)
    turns = np.cumsum(speed) / SR + .25
    saw = cutting(turns) + snags() + offcut(turns) + running_out(turns, speed) + clacks() + bump()
    tones = buzz(turns)
    direct = ports(saw + tones + bench_hum(turns))
    reflected = workshop(saw + .55 * tones, t60_s=.16, common_db=-11, apart_db=-6.5)
    return direct + reflected + quiet_room()


def record(dry):
    """A steep low-pass cuts the top."""
    return signal.sosfilt(signal.ellip(10, .1, 80, CUTOFF_HZ, fs=SR, output="sos"), dry)


dry = scene()
out = record(dry)
to_wav(out)
```